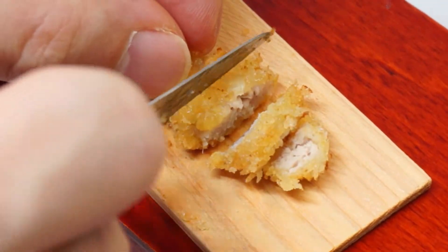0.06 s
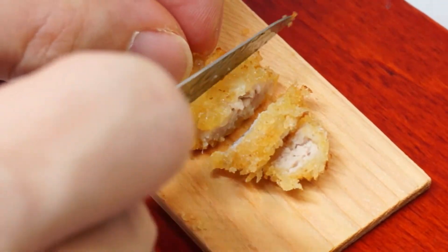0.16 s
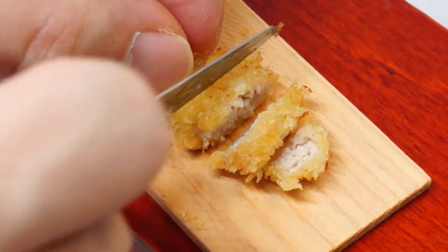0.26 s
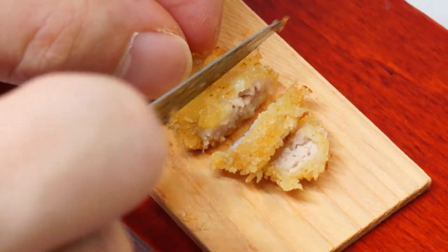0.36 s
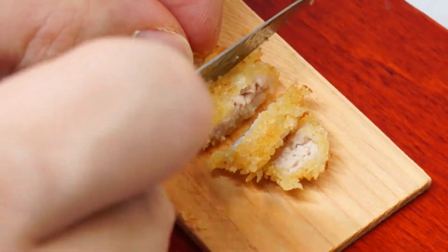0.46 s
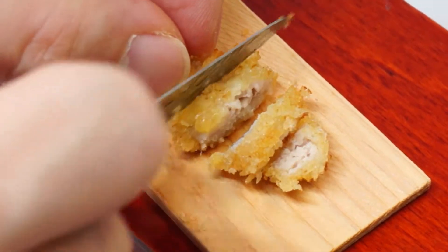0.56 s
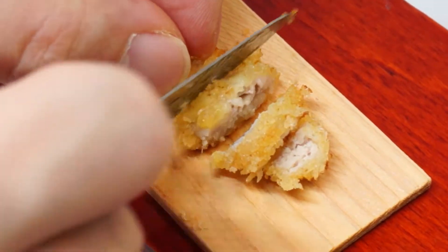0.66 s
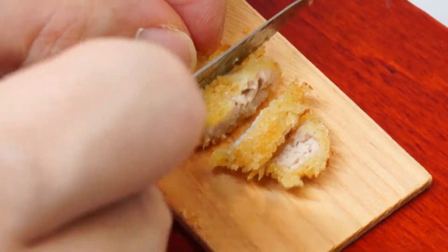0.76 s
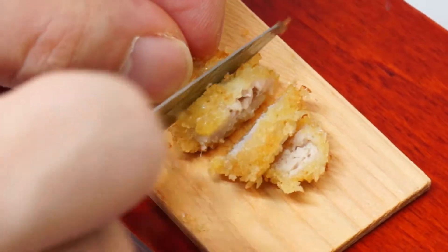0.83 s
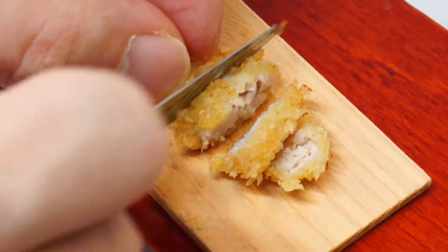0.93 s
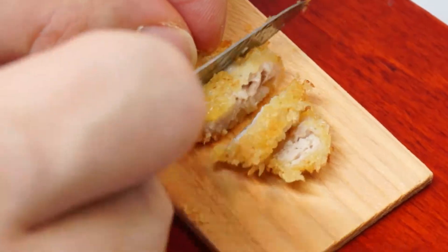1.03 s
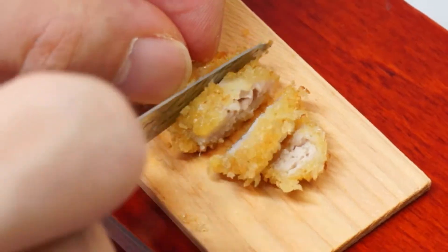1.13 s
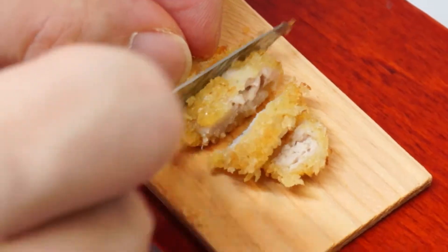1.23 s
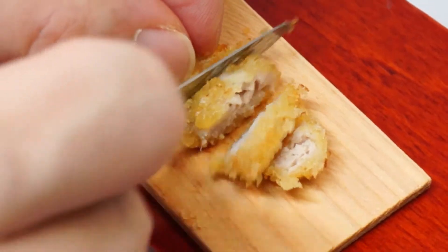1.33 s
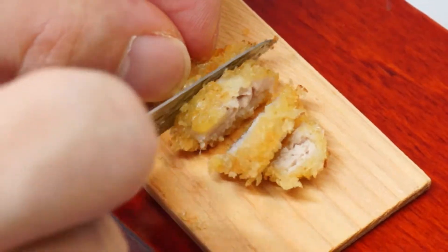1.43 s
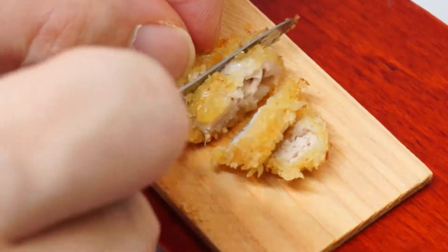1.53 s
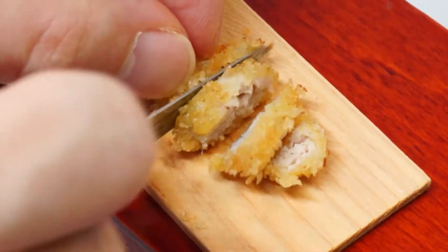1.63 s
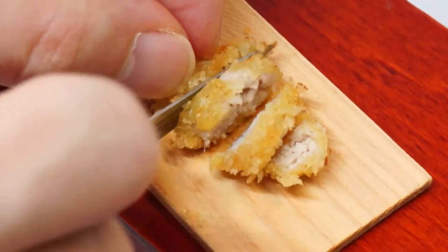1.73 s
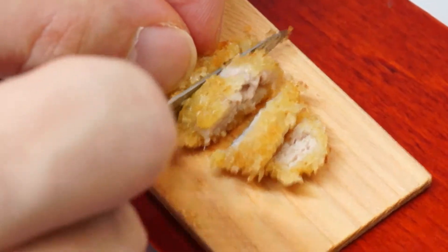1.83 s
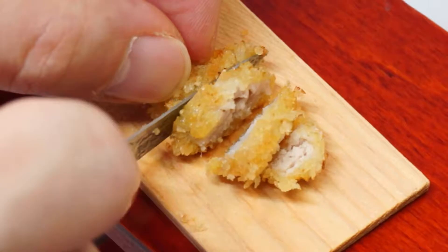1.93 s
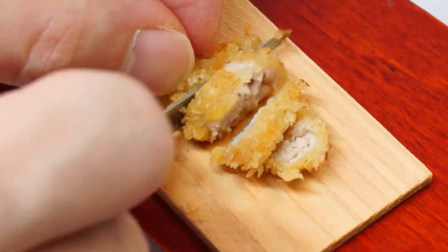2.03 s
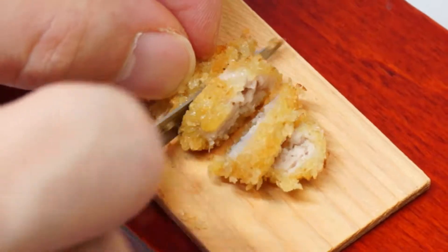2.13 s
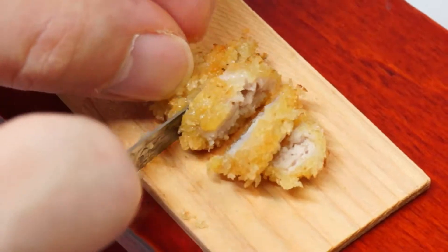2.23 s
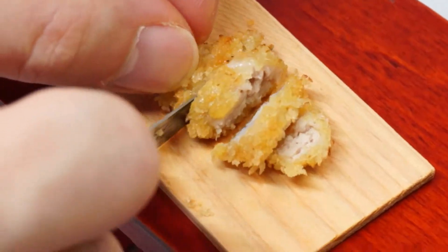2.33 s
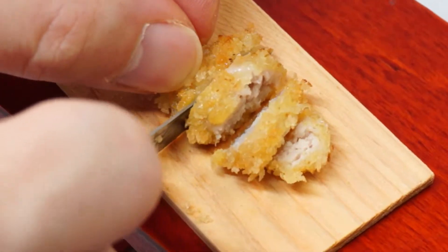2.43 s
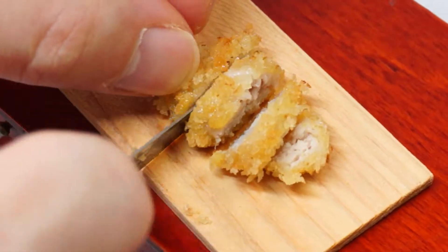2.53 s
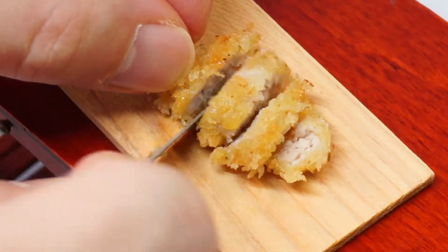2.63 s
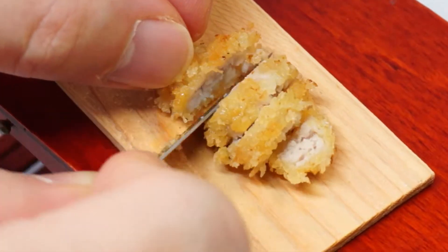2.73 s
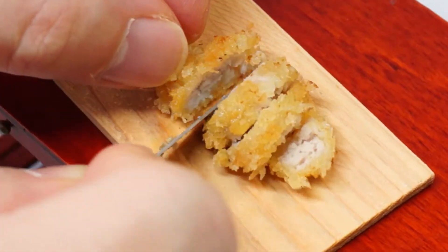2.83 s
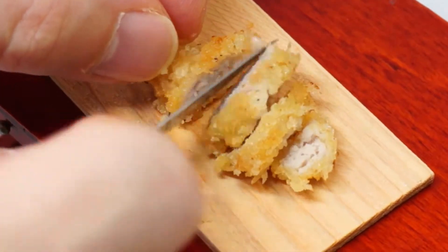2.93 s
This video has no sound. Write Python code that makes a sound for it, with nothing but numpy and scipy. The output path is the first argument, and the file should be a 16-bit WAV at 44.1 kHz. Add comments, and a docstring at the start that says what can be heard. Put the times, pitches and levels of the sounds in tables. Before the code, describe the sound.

A small knife saws through crisp breaded crust, with brittle crackles and crumbly rasps, then wooden board knocks from about one second, a denser crunch after two, and a quiet hum; close stereo microphone in a quiet room.

```python
"""A quiet room's hiss and steady appliance hum come first, and almost at once a crisp fried crust starts to crack.
A tiny knife saws and chops through it on a small wooden board, close to a stereo microphone.
Cracks are clicks with noisy tails, crumbs are showers of tiny noise bursts, and both ring the blade.
Knocks and dull thuds ring the board's modes and make it rattle; two bright brushes are swells of high hiss.
The room is coloured noise with narrow whirs and a slightly wavering sine."""
import sys
import numpy as np
from scipy import signal
from scipy.fft import rfft, irfft, next_fast_len
from scipy.io import wavfile

SR = 44100
rng = np.random.default_rng(int(sys.argv[2]) if len(sys.argv) > 2 else 0)


def amplitude_ratio(level_db):
    """Convert a level in decibels to the matching linear amplitude (field) ratio."""
    exponent = np.asarray(level_db, float) / 20
    return 10 ** exponent


def file_out(sig):
    """Save sig as 16-bit WAV at sys.argv[1]."""
    # one column per channel
    cols = np.atleast_2d(sig).T
    # limit, then scale
    lim = np.clip(cols, -1, 1)
    pcm = np.round(lim * 32767).astype(np.int16)
    wavfile.write(sys.argv[1], SR, pcm)


N = 132300  # samples

# Event times are at the source, ahead of the air path.
# Single cracks of the crust: [t/s, treble drive/dB, body over treble/dB before the common body lift]
CRACKS = [(0.0834, -30, -23), (0.091, -31.5, -30), (0.2548, -32.5, -3.5), (0.2994, -20.5, -23.5),
          (0.41, -33, -29), (0.4155, -32, -22), (0.423, -29, 4.5), (0.4476, -34, -4.5), (0.5209, -26, -21),
          (0.5265, -28, -7), (0.5352, -18.5, -18), (0.56, -30.5, -10), (0.6222, -37, -10), (0.683, -32, -8),
          (0.69, -25, -12.5), (0.715, -30, -23), (0.7784, -22, -11.5), (0.8186, -24, 1.5),
          (0.827, -28, -18), (0.887, -38, -16), (0.8922, -36, 4.5), (0.901, -29.5, -5), (1.057, -37, -20),
          (1.0786, -25, -22), (1.089, -34, 1.5), (1.1226, -30, -30), (1.1602, -28, -8), (1.1677, -26, -8),
          (1.1826, -23.5, -4), (1.2447, -34, -23), (1.258, -29, -11), (1.262, -33, 1.5),
          (1.3935, -12, -9.5), (1.403, -25.5, -10), (1.417, -31, 8.5), (1.4898, -33.5, -10),
          (1.5505, -39, -20), (1.594, -31, -24), (1.617, -20.5, -13), (1.641, -23, -6), (1.6494, -18, -23),
          (1.702, -32.5, -9), (1.9582, -32.5, -8.5), (2.0311, -29.5, -12.5), (2.0868, -24.5, -34),
          (2.1243, -34, -20), (2.146, -15.5, -28), (2.169, -20, -27), (2.1807, -33, -17),
          (2.2114, -20, -5.5), (2.2184, -13, -10.5), (2.2525, -34, -29), (2.2725, -23.5, -5),
          (2.2874, -22, 1), (2.296, -26.5, 1), (2.3055, -23, 5.5), (2.3236, -26, -4), (2.4125, -27.5, -9),
          (2.4615, -34.5, -20), (2.5418, -37, -26), (2.7053, -28.5, -8), (2.7363, -28, -7),
          (2.743, -28, -10), (2.9025, -44, -30), (2.934, -40, -37), (2.9379, -31.5, -5)]
# Saw strokes that shower crumbs: [start t/s, length/s, treble drive/dB, body over treble/dB before the lift]
STROKES = [(0.19, 0.084, -55, -28), (0.409, 0.07, -52.5, -4), (0.489, 0.1, -51, -8),
           (0.659, 0.059, -50.5, -8.5), (0.742, 0.11, -51, -3.5), (0.863, 0.086, -59, 2),
           (1.037, 0.093, -50.5, -7), (1.155, 0.061, -50.5, -3.5), (1.224, 0.12, -59.5, -0.5),
           (1.348, 0.12, -51, -2.5), (1.466, 0.12, -56, -7.5), (1.589, 0.091, -48, -14),
           (1.84, 0.078, -56, -21), (2.068, 0.12, -48.5, -9.5), (2.131, 0.058, -47.5, -3),
           (2.195, 0.12, -46.5, -3), (2.265, 0.087, -53, 4), (2.358, 0.084, -56, 1.5),
           (2.71, 0.078, -51.5, -6), (2.523, 0.13, -67, 4.5)]
# Treble colour of cracks and crumbs: [f/Hz, level/dB]
SNAP_COLOUR = [(2940, -65), (5000, -9), (7020, -9.5), (8410, 0.5), (11500, 0), (12600, -3), (15700, -6.5),
               (16300, -30)]
# Colour of their lower part: [f/Hz, level/dB]
BODY_COLOUR = [(1120, -16), (1900, -18), (2440, -8), (3510, 3), (4110, -1.5), (4490, 1.5), (4900, -8),
               (6500, -8.5), (8450, -15), (14300, -120)]
# Blade and crust resonances: [f/Hz, relative level/dB, t60/s]
BLADE_MODES = [(1749, 10, 0.063), (2490, 3, 0.06), (2936, 13, 0.05), (3570, -2.5, 0.052),
               (4520, 4.5, 0.075)]
# Blade lands on the board: [t/s, mid peak level/dB before rattle, brightness/dB per doubling of 1 + f/520 Hz]
KNOCKS = [(1.1025, -18, -3), (1.3725, -17.5, 1), (1.6085, -16.5, 2.5), (1.8935, -20, 1.5), (2.151, -22, -2),
          (2.3955, -18, 2)]
# Board rocks and settles, dull thuds: same columns as KNOCKS
THUDS = [(0.088, -41, -60), (0.217, -37, -25), (0.534, -35.5, 12), (0.816, -31.5, -1), (0.896, -31, 5),
         (1.056, -34, -16), (1.14, -32, 10), (1.171, -26.5, 11), (1.411, -30, 8), (1.446, -27, -15),
         (1.671, -36, -2), (1.695, -27, 3), (1.96, -27, -5), (2.058, -32.5, 1), (2.221, -28.5, -0.5),
         (2.309, -32, 7), (2.428, -31.5, 18), (2.543, -38.5, 4), (2.94, -37.5, 25)]
# Board and table modes: [f/Hz, relative level/dB, t60/s, side over mid/dB]
BOARD_MODES = [(138, 1.5, 0.16, -19.5), (170.6, 2, 0.069, -56), (208.3, -1, 0.12, -14.5),
               (239.8, 8, 0.037, -39), (298.3, 3.5, 0.068, -30), (385.8, 4, 0.06, -13),
               (485.5, -1.5, 0.094, -15), (533.4, 4, 0.035, -14), (786, -5.5, 0.027, -3.5),
               (855.4, 2, 0.031, -38), (1009, -13, 0.065, -2), (1454, -8, 0.025, -14),
               (1666, -8, 0.015, -10), (3697, -13.5, 0.016, -14.5)]
# Smooth bright brushes, perhaps the blade sliding: [start t/s, length/s, level at the crest/dB rms]
BRUSHES = [(0.908, 0.087, -55), (1.689, 0.048, -54.5)]
# Room noise colour: [f/Hz, relative level/dB per Hz]
ROOM_COLOUR = [(28, -24.5), (151, 0), (195, -4.5), (281, -2), (351, -5.5), (492, -9.5), (1140, -25),
               (2660, -33), (3520, -32), (8410, -34), (12800, -32), (15800, -35)]
# Width of the room noise: [f/Hz, side over mid/dB]
ROOM_WIDTH = [(60, -17), (110, -17), (200, -13), (380, -9.5), (700, -2), (1290, -0.5), (2380, -0.5),
              (4400, -4.5), (8120, -20), (15000, -48)]
# Narrow whirs: [f/Hz, width/Hz, mid level/dB rms]
WHIRS = [(53.4, 18, -59), (1657, 29, -72), (3537, 300, -72), (5500, 39, -80)]


def shape(x, table):
    """Colour a sound by (f/Hz, level/dB) points joined along log frequency."""
    hz, db = np.array(table, float).T
    size = next_fast_len(x.shape[-1])
    f = np.maximum(np.arange(size // 2 + 1) * SR / size, 1)
    gain = amplitude_ratio(np.interp(np.log(f), np.log(hz), db))
    return irfft(rfft(x, size) * gain, size)[..., :x.shape[-1]]


def level(x, db):
    """Scale to an rms level."""
    return x * amplitude_ratio(db) / np.sqrt(np.mean(x ** 2))


def decay(t, t60):
    """Exponential fade from t = 0, falling 60 dB in t60 seconds."""
    return (t >= 0) * np.exp(-np.log(1000) * np.maximum(t, 0) / t60)


def add(out, x, s):
    """Mix x into out at s seconds."""
    i = int(s * SR)
    out[..., i:i + x.shape[-1]] += x[..., :out.shape[-1] - i]


def ring(x, modes):
    """Let x excite decaying modes, as a unit-energy impulse response."""
    t = np.arange(SR // 5) / SR
    response = sum(amplitude_ratio(db) * np.sin(2 * np.pi * hz * t) * decay(t, t60) for hz, db, t60 in modes)
    return signal.fftconvolve(x, response / np.sqrt(np.sum(response ** 2)))[:len(x)]


def stereo(mid, side):
    """Mid and side to left and right."""
    return np.array([mid + side, mid - side])


def add_cracks(snap, body, body_db):
    """Each crack is a click with a noisy tail and its own tilt in the treble and in the body."""
    tail_db, tail_t60_s, tilt_scatter_db = -11, 0.022, 3.0
    lead_s = .001  # room ahead of the click for the filters
    t = np.arange(SR // 12) / SR
    for s, treble_db, rel_db in CRACKS:
        burst = amplitude_ratio(tail_db) * rng.standard_normal((2, len(t))) * decay(t - lead_s, tail_t60_s)
        burst[0, SR // 1000] = 1.45 * rng.choice([-1, 1])  # the click, mid only
        tilt, low_tilt = tilt_scatter_db * rng.standard_normal(2)
        treble = shape(burst, [(6000, -tilt), (10000, 0), (15000, tilt)])
        lower = shape(burst, [(2200, -low_tilt), (5000, low_tilt)])
        add(snap, amplitude_ratio(treble_db) * treble, s - lead_s)
        add(body, amplitude_ratio(treble_db + rel_db + body_db) * lower, s - lead_s)


def crumb_shower():
    """Random grains of uneven size, each a tiny decaying noise burst: bright set, then dull set."""
    crumbs_per_s, spread_db, crumb_t60_s = 750, 4.0, .011
    t = np.arange(SR // 12) / SR
    falls = rng.random((2, 1, N)) < crumbs_per_s / SR  # the two sets fall apart in time
    sizes = falls * amplitude_ratio(spread_db * np.minimum(rng.exponential(size=(2, 1, N)), 4))
    # overlapping crumbs add in power
    power = signal.fftconvolve(sizes ** 2, decay(t, crumb_t60_s)[None, None] ** 2)[..., :N]
    return level(power.clip(0) ** .5 * rng.standard_normal((2, 2, N)), 0)


def crust():
    """Brittle crust snaps in cracks and sheds crumbs under the strokes; their lower part rings the blade."""
    body_db, ring_db = 6.5, -8.5
    snap_side_db, body_side_db = -22, -10
    rise_s, fall_s = 0.0088, 0.021  # of a stroke's pressure
    snap, body = np.zeros((2, N)), np.zeros((2, N))  # rows: mid, side
    add_cracks(snap, body, body_db)
    bright_crumbs, dull_crumbs = crumb_shower()
    now = np.arange(N) / SR
    for s, length, treble_db, rel_db in STROKES:
        ramp = np.minimum((now - s) / rise_s, (s + length - now) / fall_s + 1)
        press = np.clip(ramp, 0, 1) ** 2
        snap += amplitude_ratio(treble_db) * press * bright_crumbs
        body += amplitude_ratio(treble_db + rel_db + body_db) * press * dull_crumbs
    blade = np.array([ring(row, BLADE_MODES) for row in body])
    blade = shape(blade, [(1200, 1), (1700, -9.5)])
    low = shape(body, BODY_COLOUR) + amplitude_ratio(ring_db) * blade
    snap = shape(snap, SNAP_COLOUR)
    return stereo(snap[0] + low[0], amplitude_ratio(snap_side_db) * snap[1] + amplitude_ratio(body_side_db) * low[1])


def board(hits, scatter_db, push_s):
    """Each blow rings the modes, bass late, and the loose board rattles on; a long push is duller."""
    low_lag_s, lag_hz = .0021, 723  # the bass builds up late
    bright_hz, flip_hz = 520, 700  # brightness turns about the first; modes above the second flip polarity
    rattle_db, rattle_t60_s, rattle_tilt_db = -23.5, 0.55, -5
    out, t = np.zeros((2, N)), np.arange(SR // 3) / SR
    hz, db, t60, side_db = np.array(BOARD_MODES, float).T[:, :, None]
    late = t - low_lag_s / (1 + (hz / lag_hz) ** 4)
    swell = np.clip(2 * hz * late, 0, 1)  # over half a cycle
    polarity = np.where(hz > flip_hz, -1, 1)
    ringing = polarity * np.sin(2 * np.pi * hz * late) * decay(late, t60) * swell
    side_sign = -(-1.) ** np.arange(len(hz))[:, None]  # neighbouring modes lean to opposite sides
    push = np.hanning(int(push_s * SR) + 3)[None]
    low_cut = signal.butter(4, 125, "high", fs=SR, output="sos")
    for s, peak_db, bright_db in hits:
        scatter = scatter_db * rng.standard_normal(hz.shape)
        modes = ringing * amplitude_ratio(db + bright_db * np.log2(1 + hz / bright_hz) + scatter)
        pair = [modes.sum(0), (modes * side_sign * amplitude_ratio(side_db)).sum(0)]
        pair = signal.sosfilt(low_cut, signal.fftconvolve(pair, push))[:, :len(t)]
        # small knocks ring the same modes, damped
        noise = shape(rng.standard_normal(len(t)), [(200, 0), (2000, rattle_tilt_db)])[None]
        rattle = signal.fftconvolve(np.tile(noise, 2), pair * decay(t, 0.045), axes=1)
        rattle = level(rattle[:, len(t):2 * len(t)], rattle_db)
        rattle = rattle * decay(t, rattle_t60_s) * np.minimum(t / low_lag_s, 1)
        mid, side = pair / np.abs(pair[0]).max() + rattle
        add(out, amplitude_ratio(peak_db) * stereo(mid, side), s)
    return out


def brush():
    """Short half-sine swells of smooth, high hiss in the centre."""
    centre_hz = 12200
    colour = [(0.64 * centre_hz, -24), (centre_hz, 0), (1.35 * centre_hz, -20)]
    hiss = level(shape(rng.standard_normal(N), colour), 0)
    now = np.arange(N) / SR
    swell = sum(amplitude_ratio(db) * np.sin(np.pi * np.clip((now - s) / length, 0, 1)) for s, length, db in BRUSHES)
    return stereo(hiss * swell, 0)


def room_noise():
    """Smooth hiss and rumble: coloured noise, its stereo width set by pitch."""
    mid, side = shape(rng.standard_normal((2, N)), ROOM_COLOUR)
    above = shape(mid, [(999, -99), (1000, 0)])
    gain = amplitude_ratio(-62.5) / np.sqrt(np.mean(above ** 2))  # dB rms of the mid above 1 kHz
    return gain * stereo(mid, shape(side, ROOM_WIDTH))


def whirs():
    """Narrow bands of noise, each a soft whir near one pitch."""
    out = np.zeros((2, N))
    for hz, width, db in WHIRS:
        colour = [(max(hz - 2 * width, 9), -40), (hz, 0), (hz + 2 * width, -40)]
        mid, side = shape(rng.standard_normal((2, N)), colour)
        out += stereo(level(mid, db), level(side, db - 19))
    return out


def hum():
    """Steady appliance hum: one sine whose phase and level waver a little, its side a quarter cycle off."""
    hz, db, side_db = 441.8, -46.5, -14
    drift_rad, waver_db = .12, -1.4  # rms waver; the sign only inverts it
    waver = level(shape(rng.standard_normal((2, N)), [(1, 7), (8, -11), (20, -28), (100, -92)]), 0)
    phase = 2 * np.pi * hz * np.arange(N) / SR + drift_rad * waver[0]
    gain = amplitude_ratio(db + waver_db * waver[1]) * np.sqrt(2)  # rms to peak
    return gain * stereo(np.sin(phase), amplitude_ratio(side_db) * np.cos(phase))


def scene():
    """Crust, board and brushes, delayed by the air path to the microphone, over the room."""
    distance_m, sound_m_per_s = .5, 343
    knocks = board(KNOCKS, scatter_db=1.0, push_s=0.00014)
    thuds = board(THUDS, scatter_db=3.0, push_s=.0022)
    out = room_noise() + whirs() + hum()
    add(out, crust() + knocks + thuds + brush(), distance_m / sound_m_per_s)
    return out


def roll_off(x):
    """The treble ends steeply here."""
    return signal.sosfilt(signal.butter(12, 15790, fs=SR, output="sos"), x)


def record(dry):
    """Deliver the finished stereo mix."""
    return roll_off(dry)


dry = scene()
out = record(dry)
file_out(out)
```